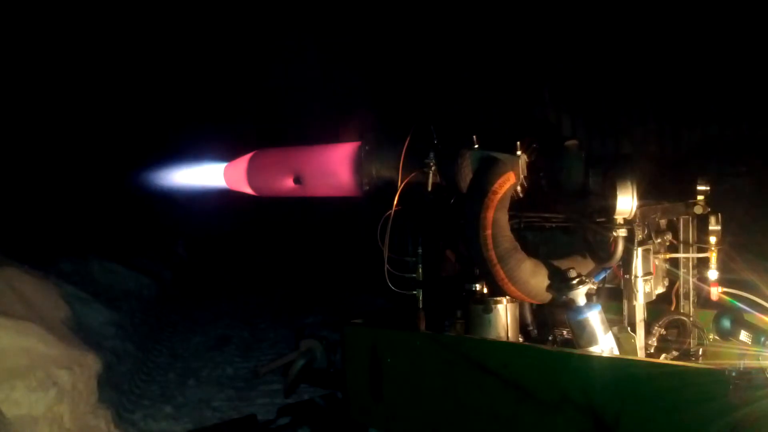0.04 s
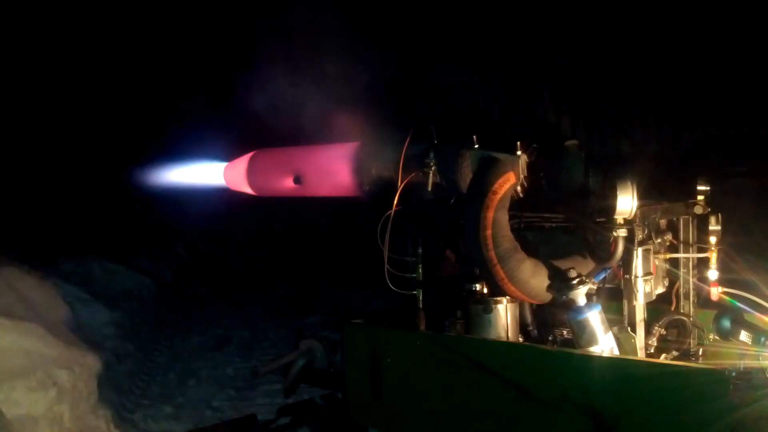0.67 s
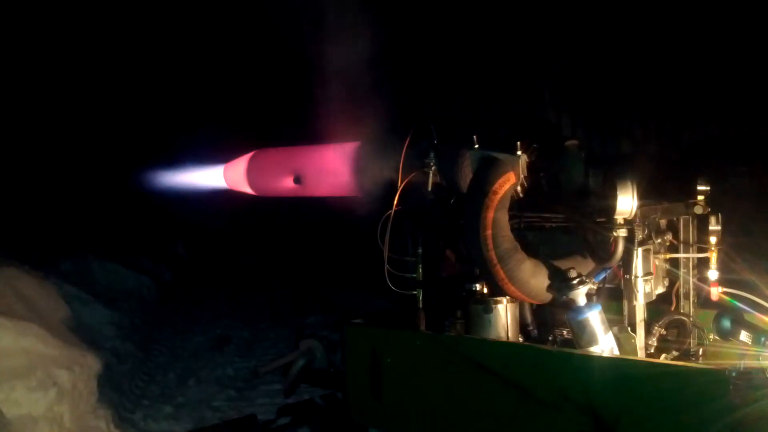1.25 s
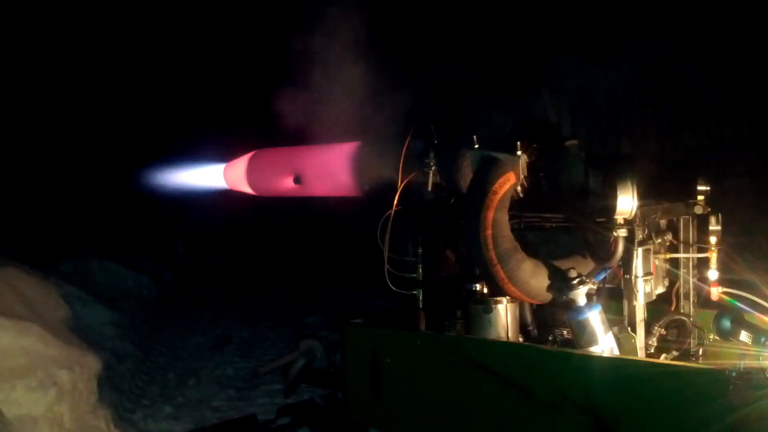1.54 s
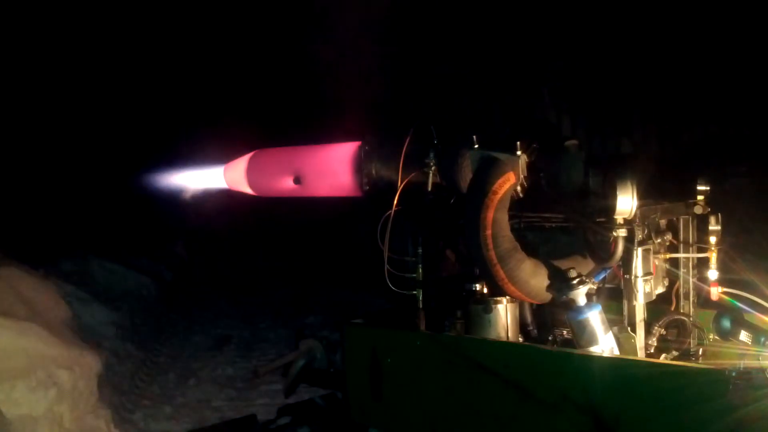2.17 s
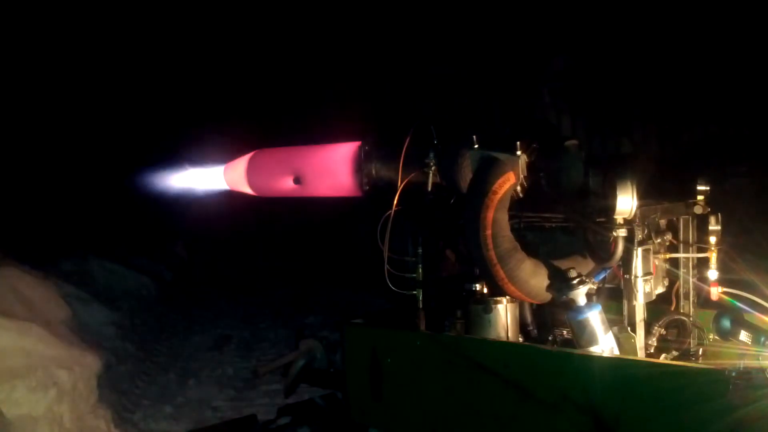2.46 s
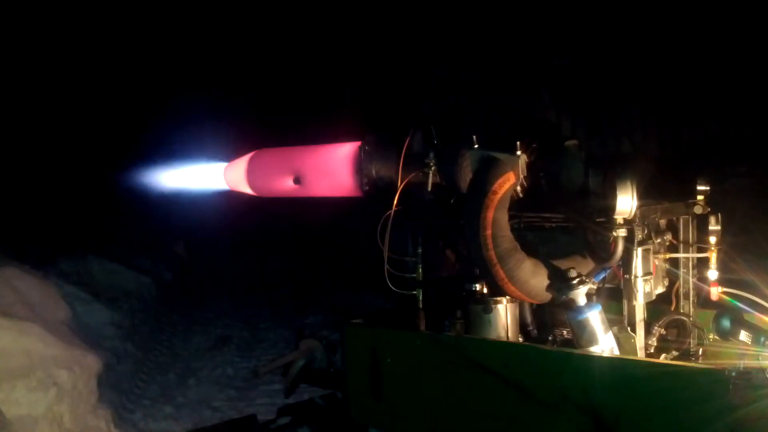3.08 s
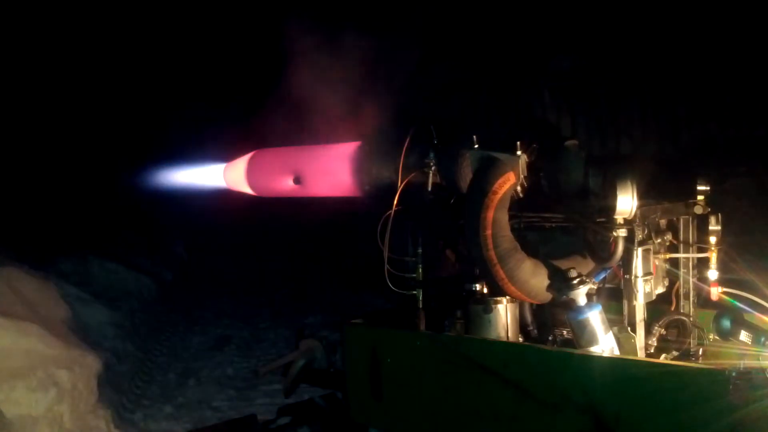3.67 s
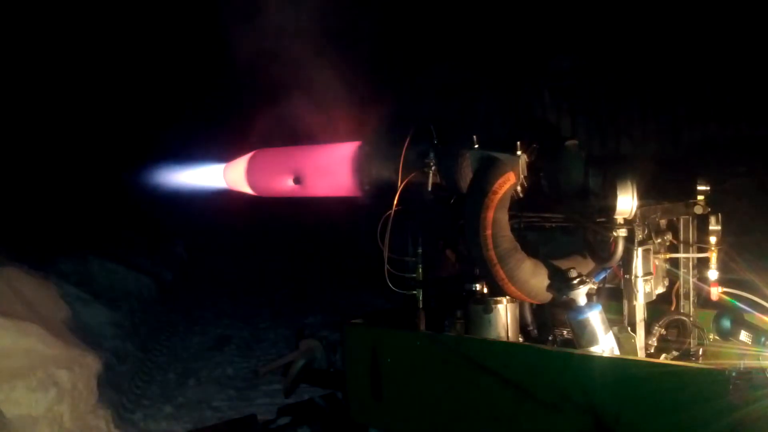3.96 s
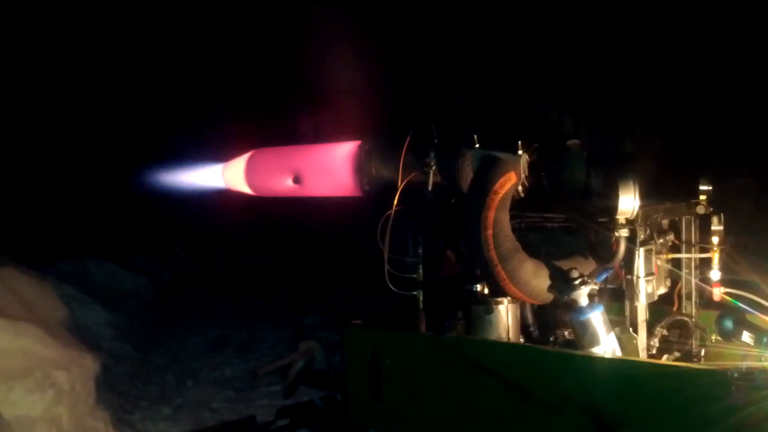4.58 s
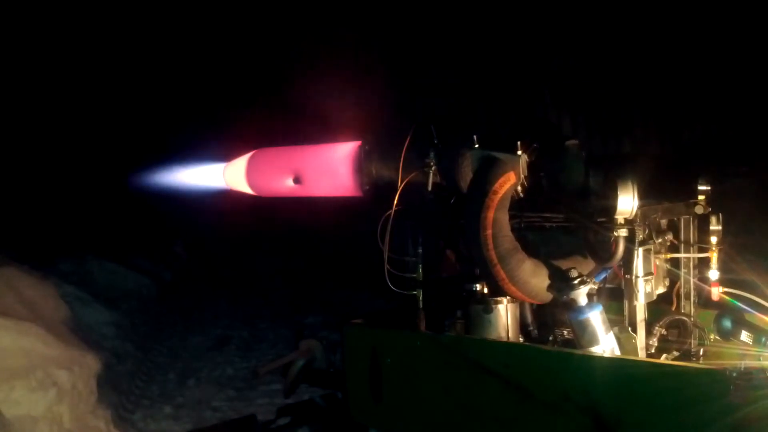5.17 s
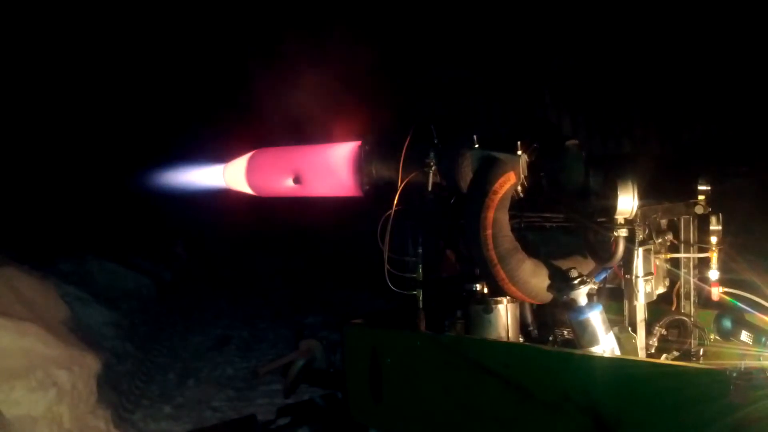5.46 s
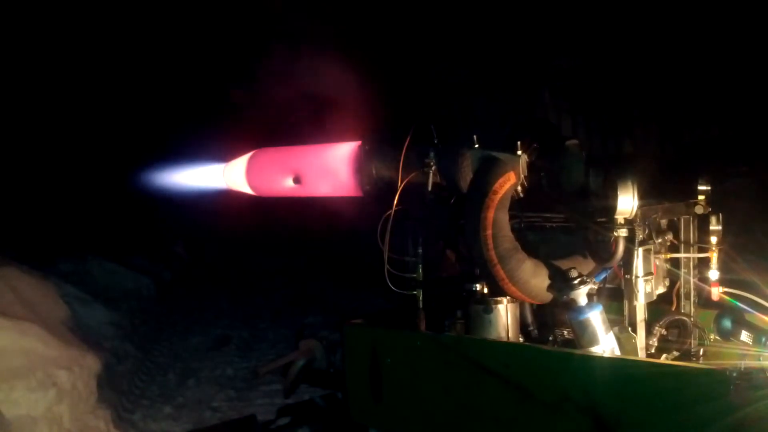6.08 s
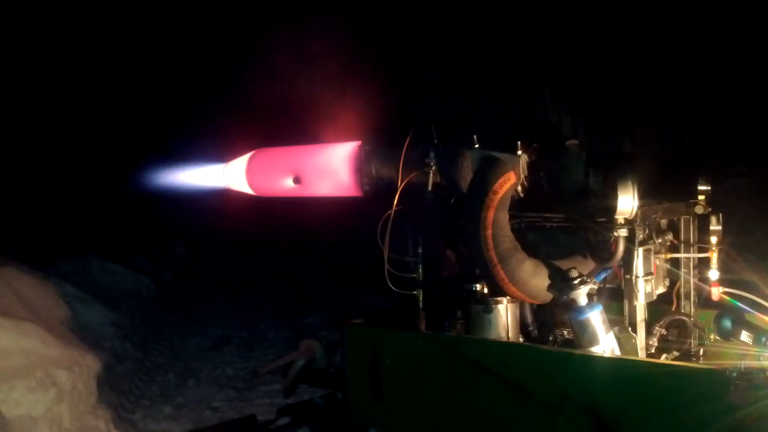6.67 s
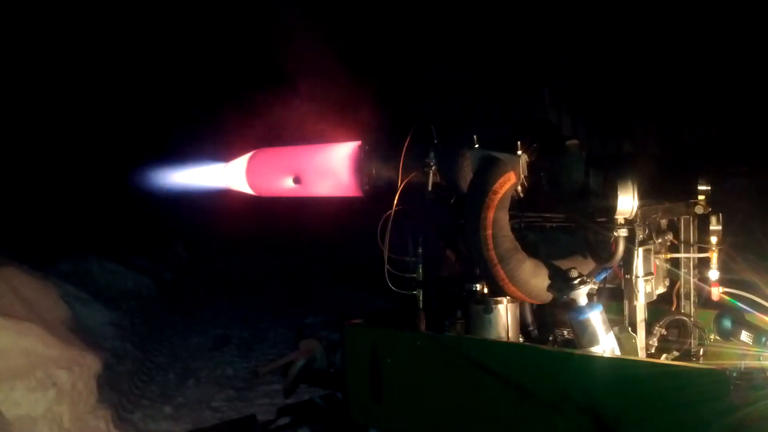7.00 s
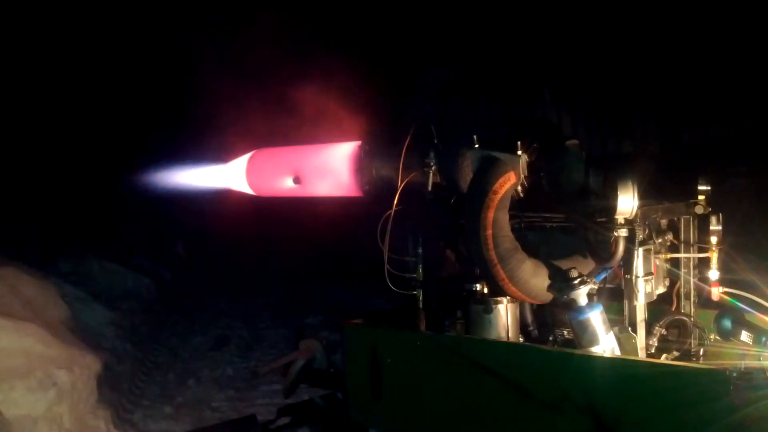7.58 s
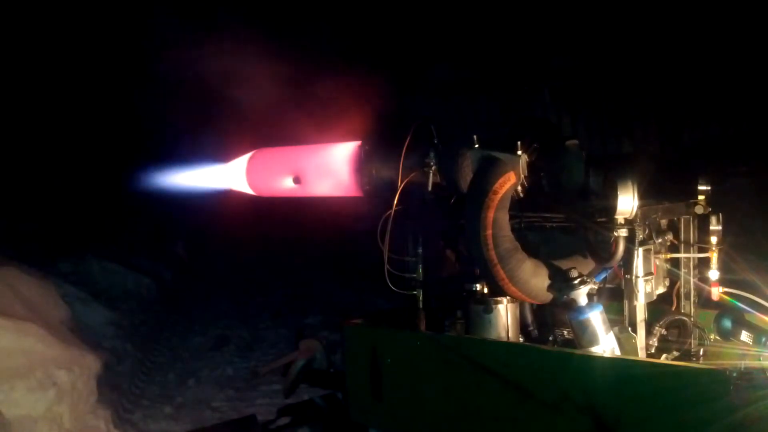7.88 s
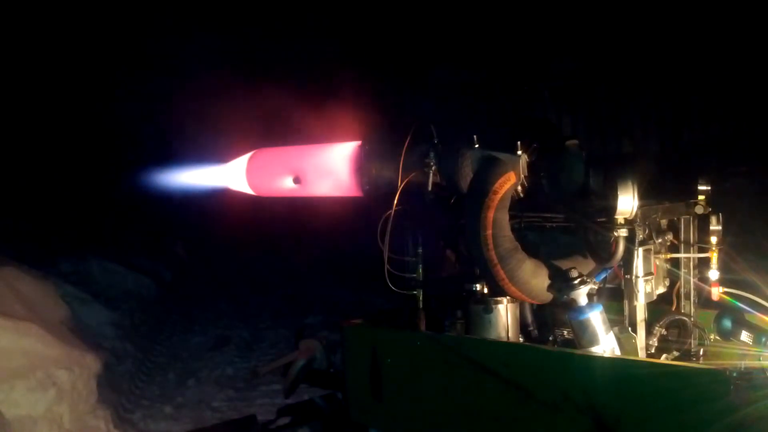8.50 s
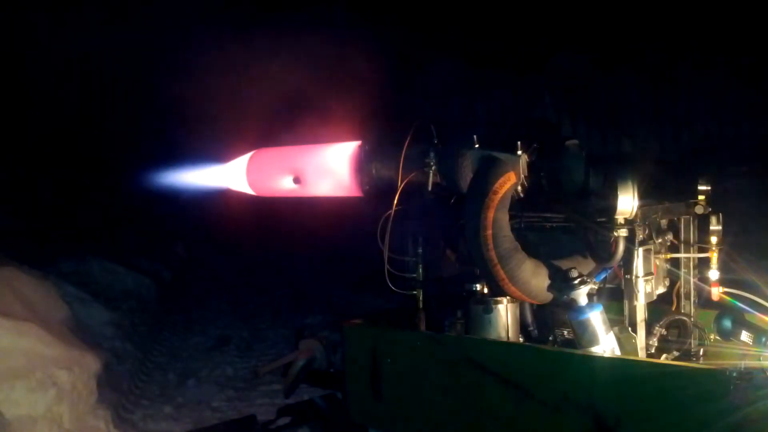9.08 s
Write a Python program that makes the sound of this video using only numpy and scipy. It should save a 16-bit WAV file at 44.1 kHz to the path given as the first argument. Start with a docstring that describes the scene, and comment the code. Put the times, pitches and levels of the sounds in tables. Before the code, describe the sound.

Loud, distorted rushing from a small jet engine runs without a break, blending flame roar and air hiss, topped by a very high, fluttering whine. The whine dips once, breaking up as the rush swells a little, then recovers and stays level. The close mono microphone is driven far into overload, so whine and rush choke each other, with slight low wind buffeting underneath.

```python
"""A piercing whine over a loud rush: a homemade turbocharger jet engine burns on its stand, very close.
The spinning compressor blades make the whine, which sags in pitch once, turns rough and recovers.
Behind it the flame roars, air hisses into the intake and gusts rumble at the small mono microphone.
The microphone is driven far into overload, so whine and rush crowd each other out."""
import sys
import numpy as np
from scipy import signal
from scipy.fft import rfft, irfft, next_fast_len
from scipy.io import wavfile

SR = 44100
rng = np.random.default_rng(int(sys.argv[2]) if len(sys.argv) > 2 else 0)


def unload_audio(sound):
    """Save the sound as a 16-bit wav file, at the path given as the first command line argument."""
    columns = np.transpose(np.atleast_2d(sound))
    # keep every value between -1 and 1, then stretch to whole-number steps
    steps = np.round(np.clip(columns, -1, 1) * 32767)
    wavfile.write(sys.argv[1], SR, steps.astype(np.int16))


N = 411891

# how fast the shaft spins (time [s], speed [turns a second])
SHAFT_SPEED = [(0.0, 1219.9), (0.34, 1236.1), (0.52, 1249.9), (0.98, 1269.8), (1.56, 1272.0), (1.7, 1254.0),
               (2.05, 1180.1), (2.39, 1141.6), (2.76, 1120.9), (2.96, 1131.2), (3.54, 1211.6),
               (3.9, 1228.5), (4.4, 1234.2), (4.72, 1233.0), (5.2, 1236.3), (5.66, 1231.6), (6.3, 1235.1),
               (9.34, 1237.4)]
# the whine briefly swells (+) or fades (-) (time [s], length [s], change [dB])
WHINE_SWELLS = [(0.19, 0.08, -1), (0.64, 0.093, 3), (1.22, 1, -3), (1.667, 0.061, 5.5), (2.22, 0.08, -3),
                (2.38, 0.14, 4.5), (3.131, 0.098, -2), (3.251, 0.092, 7), (3.75, 0.12, -2.5),
                (3.919, 0.13, 2), (4.36, 0.24, -3.5), (5.31, 0.08, -4.5), (5.42, 0.2, 1.5),
                (6.7, 0.42, 1.9), (7.26, 0.11, -4.5), (7.56, 0.091, -4), (8.12, 0.11, -0.5),
                (8.36, 0.15, 1.5), (8.51, 0.09, -3.5), (8.98, 0.17, -5.5)]
# unequal blades add tones just above the main whine (pitch [times the shaft speed], level [dB])
UPPER_TONES = [(9, -18.5), (10, -21.5), (11, -21)]
# the housing resonates and lifts those tones as they glide through (pitch [Hz], width [Hz], lift [dB])
HOUSING_RESONANCES = [(10140, 800, 6.5), (12730, 250, 4)]
# faint tones below the main whine (pitch [times the shaft speed], level [dB])
LOWER_TONES = [(5, -24), (6, -38), (7, -25)]
# tone colour of the burning jet (frequency [Hz], relative level [dB])
ROAR_COLOUR = [(20, -7), (70, 2), (200, 1.5), (600, 0.5), (1500, -4), (3500, -9), (7000, -11.5),
               (16000, -19.5)]
# the flame flares up (time [s], length [s], lift [dB])
FLAME_FLARES = [(1.92, 0.16, 1.3), (4.43, 0.08, 2), (8.5, 0.072, 0)]
# tone colour of air torn by the compressor (frequency [Hz], relative level [dB])
HISS_COLOUR = [(2000, -14.5), (6000, -10), (8000, -4.5), (9500, -0.5), (10400, 1), (11200, -0.5),
               (12300, 2), (13400, -0.5), (14200, -2), (16000, -1.5), (21000, -11)]
# tone colour of air buffeting the microphone (frequency [Hz], relative level [dB])
RUMBLE_COLOUR = [(10, -4), (38, 0), (70, -13), (200, -32), (1000, -70)]
# the strongest gusts at the microphone (time [s], length [s], lift [dB])
STRONG_GUSTS = [(1.05, 0.2, 4), (2.65, 0.15, 5), (3.65, 0.3, 4), (4.88, 0.18, 8), (8.0, 0.35, 8),
                (8.62, 0.15, 6), (9.2, 0.2, 8)]


def compressor_whine(shaft_hz, rough, blades=8, whine_db=0.58, rough_db=-9.0, speed_wobble=0.0009):
    """Each passing blade pushes the air, making a tone; rough flow weakens it and breaks it up."""
    wobbling_hz = shaft_hz * (1 + speed_wobble * eddies(corner_hz=2.5))
    shaft_angle = 2 * np.pi * np.cumsum(wobbling_hz) / SR
    flutter_db = (0.77 + 2.0 * rough) * eddies(corner_hz=30.4)
    level_db = whine_db + rough_db * rough + swells(WHINE_SWELLS) + flutter_db
    whine = gain(level_db) * fluttering_tone(blades * shaft_angle, scatter=0.34, corner_hz=92)
    for multiple, db in UPPER_TONES:
        pitch_hz = multiple * shaft_hz
        lift_db = sum(lift * bump(pitch_hz, hz, width) for hz, width, lift in HOUSING_RESONANCES)
        whine += gain(db + lift_db) * fluttering_tone(multiple * shaft_angle, scatter=0.35, corner_hz=30)
    for multiple, db in LOWER_TONES:
        whine += gain(db) * fluttering_tone(multiple * shaft_angle, scatter=0.31, corner_hz=30)
    return whine


def flame_roar(rough, roar_db=-3.5, rough_db=3.0, flicker_db=0.9):
    """The burning jet roars and flickers, louder in rough flow."""
    level_db = roar_db + rough_db * rough + swells(FLAME_FLARES) + flicker_db * eddies(corner_hz=17)
    return gain(level_db) * noise(ROAR_COLOUR)


def intake_hiss(rough, hiss_db=-2.5, rough_db=2.5, flicker_db=1.0):
    """Air hisses over the compressor blades, louder in rough flow."""
    level_db = hiss_db + rough_db * rough + flicker_db * eddies(corner_hz=30)
    return gain(level_db) * noise(HISS_COLOUR)


def gust_rumble(rumble_db=-19, waver_db=1.5):
    """Stirred air rumbles at the microphone in uneven gusts."""
    level_db = rumble_db + swells(STRONG_GUSTS) + waver_db * eddies(corner_hz=3)
    return gain(level_db) * noise(RUMBLE_COLOUR)


def fluttering_tone(phase, scatter, corner_hz):
    """A tone of average strength 1; swirling air scatters part of it, so its level and timing flutter."""
    flutter = 1 + scatter * (eddies(corner_hz) + 1j * eddies(corner_hz))
    return np.real(flutter * np.exp(1j * phase)) / np.sqrt(.5 + scatter ** 2)


def eddies(corner_hz):
    """The random wandering of swirling air, of typical size 1 and mostly slower than corner_hz."""
    smoothing = np.exp(-2 * np.pi * corner_hz / SR)
    wander = signal.lfilter([1 - smoothing], [1, -smoothing], rng.standard_normal(N))
    return wander / wander.std()


def noise(colour):
    """Noise of average strength 1, shaped by rows of (frequency [Hz], relative level [dB])."""
    hz, db = np.transpose(colour)
    size = next_fast_len(N)
    frequencies = np.maximum(np.fft.rfftfreq(size, 1 / SR), 1)
    shape = gain(np.interp(np.log(frequencies), np.log(hz), db))
    rush = irfft(rfft(rng.standard_normal(size)) * shape, size)[:N]
    return rush / rush.std()


def swells(events):
    """Smooth rises and dips in level, from rows of (time [s], length [s], change [dB])."""
    t = np.arange(N) / SR
    return sum(db * bump(t, peak_time, length) for peak_time, length, db in events)


def bump(x, centre, width):
    """A bell-shaped curve of height 1; the width is taken at half height."""
    return 0.5 ** ((2 * (x - centre) / width) ** 2)


def gain(db):
    """Turns decibels into a number to multiply a sound by."""
    return 10 ** (np.asarray(db) / 20)


def scene():
    """One engine, alike in both channels; the shaft speed sets the pitch and how rough the airflow is."""
    shaft_hz = np.interp(np.arange(N) / SR, *np.transpose(SHAFT_SPEED))
    # the flow is rough in one range of speeds, crossed on the way down and again on the way up
    rough = bump(shaft_hz, centre=1167.5, width=65.5)  # 0 is smooth, 1 is roughest
    engine = compressor_whine(shaft_hz, rough) + flame_roar(rough) + intake_hiss(rough) + gust_rumble()
    return np.array([engine, engine])


def overload(sound, drive_db, bias, oversample=4):
    """The overloaded input flattens the peaks of the wave; the bias makes it flatten one side more."""
    # finer time steps keep the new overtones from folding back as false lower tones
    driven = signal.resample_poly(sound, oversample, 1) * gain(drive_db)
    return signal.resample_poly(np.tanh(driven + bias), 1, oversample)


def thin_bass(sound, corner_hz, bass_db):
    """Turns down everything below corner_hz."""
    bass = signal.sosfilt(signal.butter(1, corner_hz, fs=SR, output="sos"), sound)
    return sound - (1 - gain(bass_db)) * bass


def record(dry, bottom_hz=20, top_hz=15700):
    """The microphone overloads, the bass is thinned, and the very bottom and top are cut off."""
    # big swings of the roar push the input to its limit and choke whine and hiss for an instant;
    # being lopsided, the overload also blends whine and hiss into a lower rush
    crushed = gain(-3.5) * overload(dry.mean(axis=0), drive_db=8, bias=1.0)
    thinned = thin_bass(crushed - crushed.mean(), corner_hz=2470, bass_db=-8.5)
    centred = signal.sosfilt(signal.butter(1, bottom_hz, "high", fs=SR, output="sos"), thinned)
    top_cut = signal.firwin(1001, top_hz, fs=SR, window=("kaiser", 7))
    return np.tile(signal.fftconvolve(centred, top_cut, "same"), (2, 1))


dry = scene()
out = record(dry)
unload_audio(out)
```